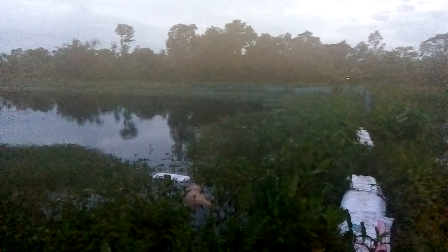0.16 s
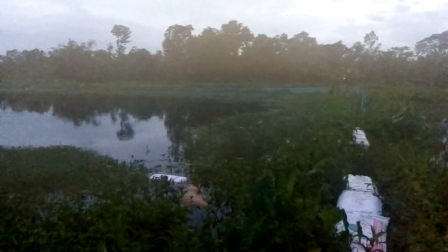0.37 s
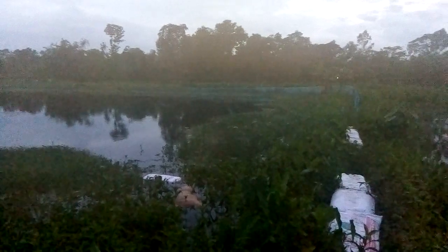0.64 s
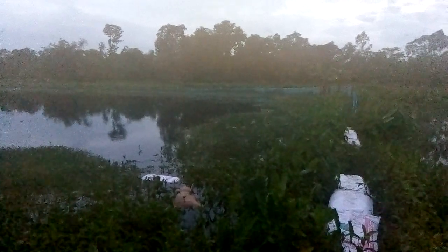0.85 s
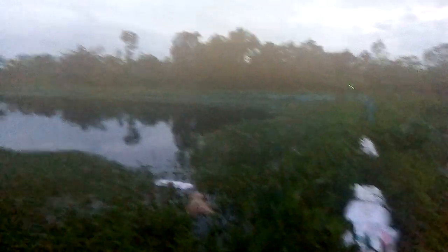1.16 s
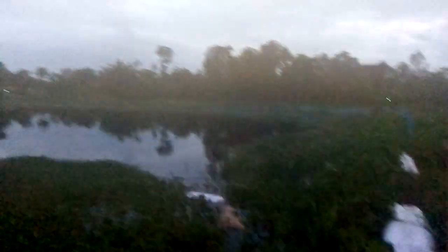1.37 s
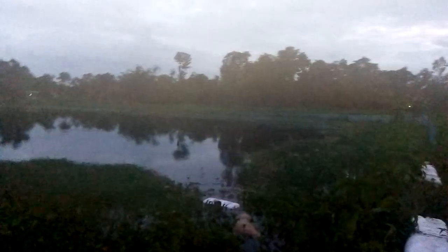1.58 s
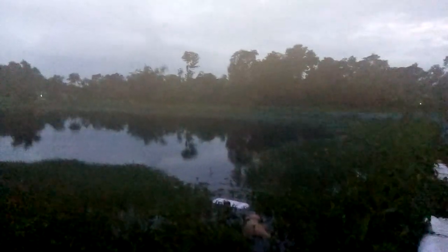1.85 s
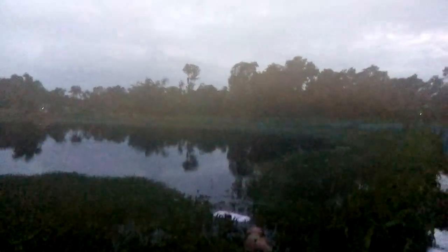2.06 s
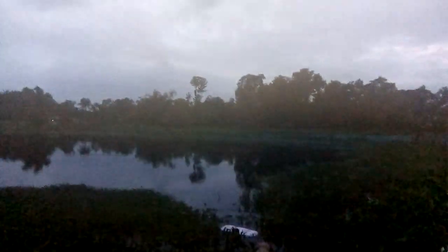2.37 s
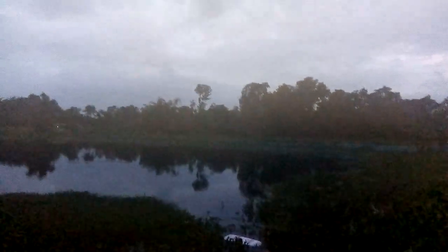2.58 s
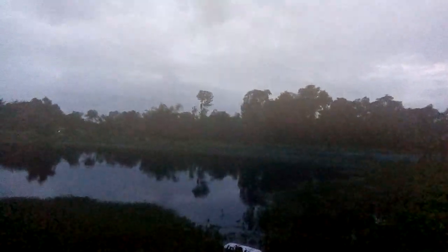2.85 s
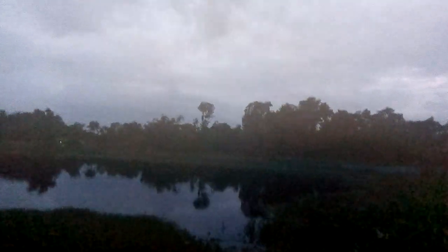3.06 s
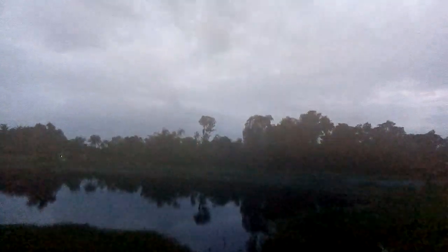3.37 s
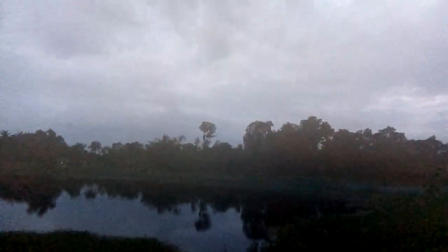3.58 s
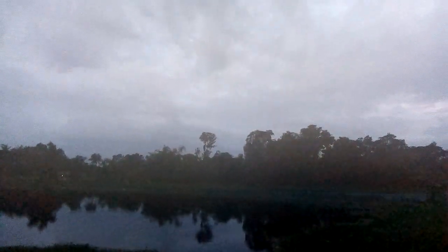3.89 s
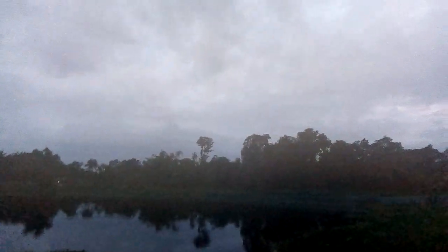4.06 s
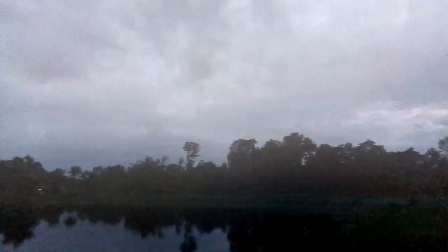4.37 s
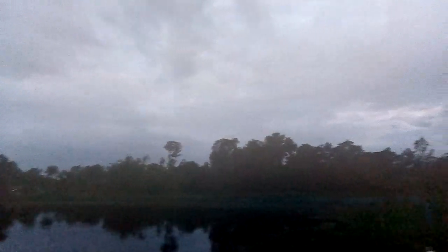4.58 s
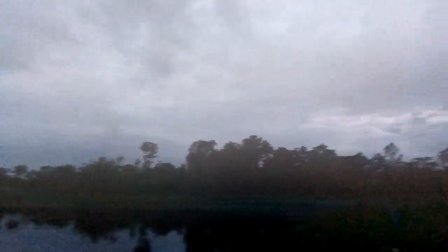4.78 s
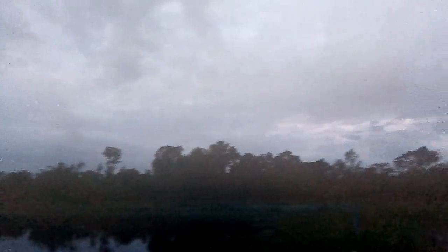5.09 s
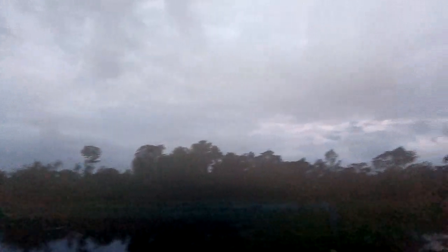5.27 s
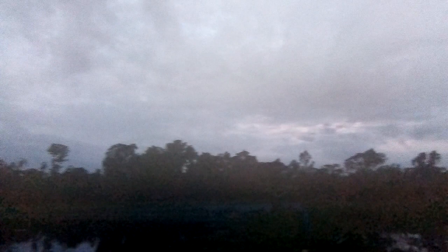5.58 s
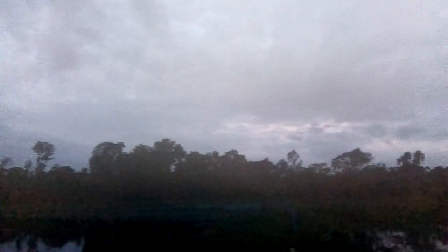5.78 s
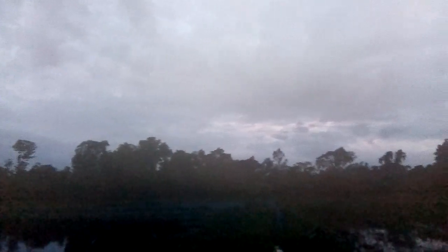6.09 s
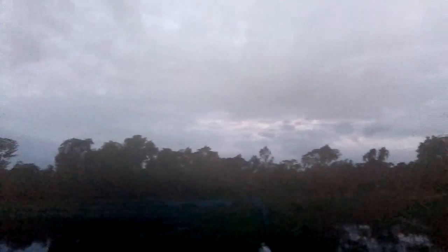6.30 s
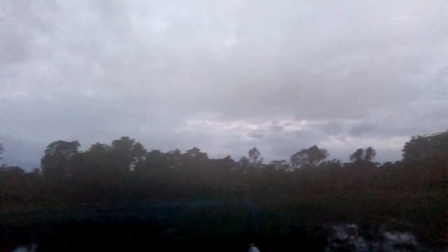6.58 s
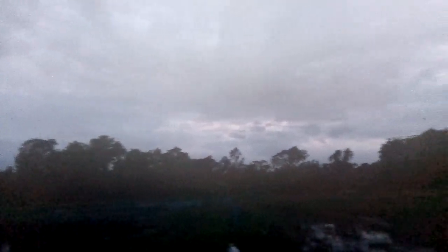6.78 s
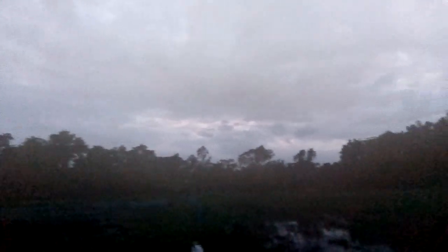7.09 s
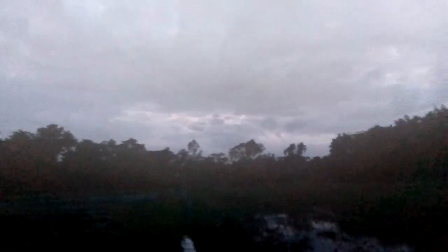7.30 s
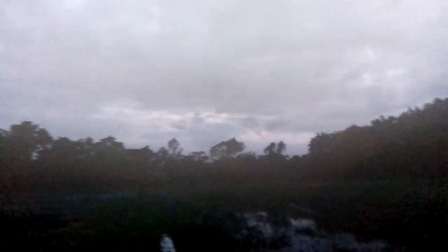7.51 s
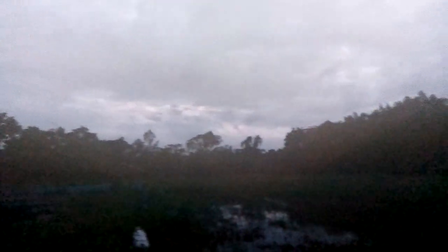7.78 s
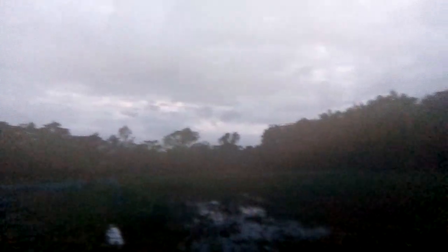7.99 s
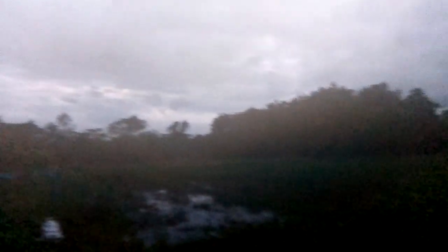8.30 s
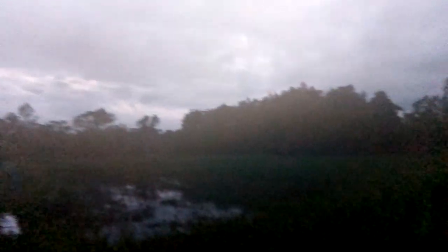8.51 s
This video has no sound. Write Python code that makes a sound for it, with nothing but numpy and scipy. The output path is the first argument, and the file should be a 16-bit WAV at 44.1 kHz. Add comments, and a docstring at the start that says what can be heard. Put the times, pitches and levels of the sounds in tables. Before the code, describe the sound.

Shrill insects drone beside a weedy pond, with rasping katydid swells, echoing four-note cuckoo calls, soft coos, bird chatter and faint late knocks.

```python
"""A far cricket chorus, made of coloured noise, rings over a weedy pond at dusk.
One cricket chirps, a close insect buzzes and then stops, and a katydid rasps: pulsed tones and noise.
A cuckoo repeats four notes, something coos across the water, and birds whistle and chatter:
gliding tones and noise bursts, echoed by the trees. Thin insect trills and still air lie around them.
Soft bumps sound near the microphone, and a few small knocks, made of dying sines, come near the end."""
import sys
import numpy as np
from scipy import signal
from scipy.fft import rfft, irfft, next_fast_len
from scipy.io import wavfile

SR = 44100
rng = np.random.default_rng(int(sys.argv[2]) if len(sys.argv) > 2 else 0)


def dump_mix(stems):
    """Bounce the given channels to the path in sys.argv[1] as a 16-bit WAV at rate SR."""
    frames = np.atleast_2d(stems).T  # one column per channel
    limited = np.clip(frames, -1, 1)  # hard clip at full scale
    pcm = np.round(limited * 32767).astype(np.int16)
    wavfile.write(sys.argv[1], SR, pcm)


N = 381465
TIME = np.arange(N) / SR

# Levels of notes and bursts in the tables hold before the edges are faded and echoes are added.


def from_db(db):
    """Turn decibels into a factor on the sound pressure."""
    return 10 ** (np.asarray(db) / 20)


def rms_one(x):
    """Scale a sound to an rms strength of 1."""
    return x / np.sqrt(np.mean(np.abs(x) ** 2) + 1e-20)


def in_time(rows):
    """Join the points of a table by straight lines; give each column at every sample."""
    s, *columns = np.transpose(rows)
    return [np.interp(TIME, s, column) for column in columns]


def add(out, s, sound):
    """Mix a sound in at a given time."""
    at = int(np.clip(s * SR, 0, len(out)))
    out[at:at + len(sound)] += sound[:len(out) - at]


def flutter(width_hz, size=N):
    """Complex noise that spreads a tone over about the given width; rms 1 before trimming."""
    padded = next_fast_len(size + 4096)
    hz = np.fft.fftfreq(padded, 1 / SR)
    white = rng.standard_normal(padded) + 1j * rng.standard_normal(padded)
    narrowed = white / (1 + (2 * hz / width_hz) ** 4)
    return rms_one(np.fft.ifft(narrowed))[:size]


def drift(rate_hz):
    """Random wandering up to about the given rate; rms 1."""
    return rms_one(flutter(2 * rate_hz).real)


def coloured(spectrum):
    """Noise with a given balance of low and high; rms 1."""
    hz, level_db = np.transpose(spectrum)
    bins_hz = np.maximum(np.fft.rfftfreq(N, 1 / SR), 1)
    gain = from_db(np.interp(np.log(bins_hz), np.log(hz), level_db))
    return rms_one(irfft(rfft(rng.standard_normal(N)) * gain, N))


def tone(hz, wobble=1):
    """A sine on a pitch track, times a complex wobble; a steady one has rms 1."""
    phase = 2 * np.pi * np.cumsum(hz) / SR
    return np.sqrt(2) * (wobble * np.exp(1j * phase)).real


def faded(sound, taper):
    """Round off both ends; taper is the share of the sound that is fading."""
    return sound * signal.windows.tukey(len(sound), taper)


def note(length_s, start_hz, middle_hz, end_hz, rough, rough_hz, taper):
    """One whistled arch through three pitches, made unsteady by noise."""
    size = max(int(length_s * SR), 10)
    arch = np.polyfit([0, .5, 1], [start_hz, middle_hz, end_hz], 2)
    pitch_hz = np.polyval(arch, np.linspace(0, 1, size))
    wobble = (1 + rough * flutter(rough_hz, size)) / np.hypot(1, rough)
    return faded(tone(pitch_hz, wobble), taper)


def song(notes, rough, rough_hz, taper, size=N):
    """Place all the notes of one kind of caller in time."""
    out = np.zeros(size)
    for s, length_s, start_hz, middle_hz, end_hz, db in notes:
        add(out, s, from_db(db) * note(length_s, start_hz, middle_hz, end_hz, rough, rough_hz, taper))
    return out


def slur(s, length_s, hz, glide, db, arch=0):
    """Describe a gliding note that may arch in the middle; glide and arch are shares of its pitch."""
    return s, length_s, hz * (1 - glide / 2), hz * (1 + arch), hz * (1 + glide / 2), db


def repeated(notes, phrases):
    """Sing the same notes again in every phrase."""
    return [(s + offset, *shape, db + note_db)
            for s, db in phrases
            for offset, *shape, note_db in notes]


def bursts(rows, taper):
    """Short noisy sounds, each a band of noise around one resonance."""
    out = np.zeros(N)
    for s, length_s, hz, width_hz, db in rows:
        size = max(int(length_s * SR), 10)
        noise = tone(np.full(size, hz), flutter(width_hz, size))
        add(out, s, from_db(db) * faded(noise, taper))
    return out


# Echoes from the tree line: (delay [s], level before the caller's echo_db is added [dB])
TREE_ECHOES = [(.105, -48.5), (0.188, -25), (0.308, -24.5), (0.544, -21.5)]


def outdoors(x, scatter_db, t60, echo_db):
    """Sound scatters off the banks, dying 60 dB in t60 seconds, and returns smeared from the trees."""
    t = TIME[:SR]
    tail = rng.standard_normal(SR) * from_db(-60 * t / t60)
    response = from_db(scatter_db) * rms_one(tail) / np.sqrt(SR)
    for delay_s, db in TREE_ECHOES:
        smear = rng.standard_normal(SR) * np.exp(-np.abs(t - delay_s) / 0.054)
        response = response + from_db(db + echo_db) * rms_one(smear) / np.sqrt(SR)
    return x + signal.fftconvolve(x, response)[:len(x)]


def weeds(x, scatter_db):
    """Short paths through the plants blur the pulses and leave their pitch lines; rms 1."""
    t = TIME[:SR // 8]
    paths = rms_one(rng.standard_normal(len(t)) * np.exp(-t / 0.005)) / np.sqrt(len(t))
    return rms_one(x + from_db(scatter_db) * signal.fftconvolve(x, paths)[:N])


# Colour of the still air: (frequency [Hz], relative level [dB per Hz])
AIR_COLOUR = [(25, -35), (50, -12.5), (85, 1), (140, -1), (200, -7), (400, -11.5), (1000, -16),
              (11000, -10.5), (12500, -50), (14000, -28), (15000, -12.5)]


def still_air():
    """The faint hush of the air, as steady coloured noise."""
    return from_db(-68.0) * coloured(AIR_COLOUR)


# Soft bumps and shuffles near the microphone:
# (time [s], length [s], centre [Hz], width [Hz], level [dB])
SOFT_BUMPS = [(1.09, 0.032, 107.4, 84, -71), (1.43, .09, 287, 180, -74), (2.53, .07, 424, 150, -74),
              (4.82, 0.086, 118.7, 75, -64), (4.8, 0.14, 291, 356.4, -71.5), (7.75, .1, 330, 252, -72.5),
              (8.16, 0.13, 570, 450, -70), (8.43, .09, 142, 115.6, -63)]


def bumps():
    """Soft thuds near the microphone, as short bands of low noise."""
    return bursts(SOFT_BUMPS, taper=0.51)


# Small knocks: (time [s], pitch [Hz], time to die 60 dB [s], peak before the attack softens it [dB])
SMALL_KNOCKS = [(8.142, 1380, .04, -46), (8.142, 1850, .025, -46), (8.141, 2200, .02, -45),
                (8.337, 830, .035, -45.5), (8.413, 920, .035, -48)]


def knocks(attack_s):
    """Small hollow knocks: resonances that start quickly and die at once."""
    out = np.zeros(N)
    t = TIME[:SR // 10]
    for s, hz, t60, db in SMALL_KNOCKS:
        strength = from_db(db - 60 * t / t60) * (1 - np.exp(-t / attack_s))
        add(out, s, strength * np.sin(2 * np.pi * hz * t))
    return out


def flock(low_hz, high_hz, glide, spread_db, tilt, rough, rough_hz, count):
    """Many distant birds slur short, hoarse notes at random; rms 1."""
    out = np.zeros(N)
    for k, (when, height, span, slope, bend, loud) in enumerate(rng.random((count, 6))):
        hz = low_hz * (high_hz / low_hz) ** height
        sweep = glide * (2 * slope - 1)
        middle_hz = hz * (1 + 2 * glide * (bend - .5))
        length_s = .025 + 0.078 * span
        chirp = note(length_s, hz * (1 - sweep), middle_hz, hz * (1 + sweep), rough, rough_hz, taper=0.53)
        strength = hz ** tilt * from_db(spread_db * loud ** 2)
        add(out, (k + when) / count * TIME[-1], chirp * strength)
    return rms_one(out)


# The far flock: (time [s], level of low voices [dB], level of high voices [dB])
FLOCK_LEVELS = [(0.1, -69, -62), (1.0, -72.5, -65.5), (1.52, -81, -65.5), (1.64, -65.5, -74),
                (4.48, -72.5, -57), (4.67, -59, -58.5), (5.54, -70.5, -61), (5.9, -60, -76),
                (6.28, -81.5, -77), (8.6, -73, -64.5)]


def far_flock():
    """Low voices slur and warble; high voices twitter harshly."""
    low_db, high_db = in_time(FLOCK_LEVELS)
    low = flock(low_hz=1821, high_hz=3354, glide=.1, spread_db=-0.5, tilt=0.43,
                rough=0.52, rough_hz=278, count=270)
    high = flock(low_hz=3326, high_hz=6980, glide=.06, spread_db=9, tilt=-0.6,
                 rough=4.2, rough_hz=710, count=300)
    return from_db(low_db) * low + from_db(high_db) * high


def thin_whistle():
    """One long thin whistle from far off, lifted slightly in the middle."""
    thin = [slur(s=5.9, length_s=1.6, hz=3127, glide=0, db=-74.5, arch=0.022)]
    return song(thin, rough=1.0, rough_hz=61, taper=0.41)


# Low coos: (time [s], length [s], pitch [Hz], glide [share of the pitch], level [dB])
COO_NOTES = [(0.269, 0.39, 604, -0.11, -71.5), (1.332, .33, 768, 0.029, -79),
             (2.196, .13, 710, -.04, -80.5), (2.618, 0.39, 690, -0.058, -75.5),
             (3.62, 0.25, 679, -.25, -69.5), (3.94, 0.23, 589, -.03, -77), (4.324, 0.28, 722, -.12, -61),
             (4.548, 0.22, 636, -.17, -65), (5.348, 0.42, 618, -0.038, -66.5),
             (6.12, 0.23, 605, -0.036, -67.5), (6.708, 0.094, 715, -0.014, -75),
             (7.018, 0.22, 617, -0.067, -66.5)]


def coos():
    """Soft, wavering coos from across the water, each gliding and lifted a little in the middle."""
    notes = [slur(*row, arch=0.0128) for row in COO_NOTES]
    voice = song(notes, rough=.75, rough_hz=110, taper=.35)
    return outdoors(voice, scatter_db=-5, t60=1.0, echo_db=-5)


# Rising whistles: (time [s], pitch [Hz], level [dB])
RISING = [(.08, 3164, -56.5), (.24, 3180, -60.5), (1.035, 2210, -71), (2.605, 3480, -50.5),
          (3.42, 3590, -50), (4.065, 3910, -48)]
# Sharp falling chips: (time [s], pitch [Hz], level [dB])
FALLING = [(.9, 2220, -67), (1.11, 2170, -68), (1.305, 2420, -71), (3.585, 3760, -54), (3.62, 3740, -53),
           (4.24, 3790, -56), (4.645, 3670, -53.5), (5.58, 3950, -53), (8.31, 3830, -51.5)]
# Almost level piping notes: (time [s], length [s], pitch [Hz], level [dB])
PIPING = [(0.186, .05, 2090, -61), (.29, .05, 3370, -62), (0.384, .06, 2720, -57),
          (.955, 0.093, 1630, -71.5), (2.42, 0.1, 2030, -69), (3.171, .18, 2420, -59.5),
          (3.798, 0.14, 2070, -67.5), (3.928, .026, 2620, -55.5), (4.68, .24, 2450, -65),
          (4.797, .025, 2460, -48), (6.401, 0.17, 1277, -77), (6.843, .13, 1635, -80),
          (7.046, 0.072, 2247, -70), (7.295, 0.09, 1260, -72)]


def whistlers():
    """Rising whistles, falling chips and almost level pipes, as gliding tones with a flutter."""
    notes = [slur(s, .05, hz, 0.152, db) for s, hz, db in RISING]
    notes += [slur(s, .033, hz, -.21, db) for s, hz, db in FALLING]
    notes += [slur(s, length_s, hz, 0.0297, db) for s, length_s, hz, db in PIPING]
    return song(notes, rough=0.5, rough_hz=262, taper=0.27)


HOARSENESS = 0.26  # width of a hoarse call, as a share of its centre
# The loudest hoarse calls: (time [s], length [s], centre [Hz], level [dB])
HOARSE_CALLS = [(2.02, 0.18, 3970, -55.5), (2.38, .12, 4120, -55), (2.63, .17, 3700, -55.5),
                (2.91, 0.054, 4330, -52), (3.03, .1, 3570, -51), (3.16, 0.36, 3725, -54),
                (4.18, .093, 3690, -53.5), (4.43, 0.1, 2020, -61), (4.79, 0.11, 3430, -54.5),
                (4.92, 0.35, 3746, -57.5), (5.53, 0.084, 3466, -52.5), (7.11, 0.069, 2766, -59),
                (7.32, 0.097, 3186, -63), (7.655, 0.063, 2530, -63.5), (8.035, .13, 3750, -57.5),
                (8.26, .09, 3234, -57)]


def chatterers():
    """Hoarse calls as bands of noise: the higher the voice, the wider its noise."""
    calls = [(s, length_s, hz, HOARSENESS * hz, db) for s, length_s, hz, db in HOARSE_CALLS]
    return bursts(calls, taper=0.43)


# The opening rasp of a throaty phrase: (length [s], centre [Hz], level relative to the phrase [dB])
OPENING_RASP = (.09, 2430, 0)
# Then a low note that sinks away, and an upward flick: (time into the phrase [s], length [s],
# start [Hz], middle [Hz], end [Hz], level relative to the phrase [dB])
THROAT_NOTES = [(.165, .07, 2042, 1915, 1900, -2), (.23, .095, 1822, 1772, 1956, -16.5),
                (.333, .034, 2166, 2154, 2480, -2)]
# When the phrase comes: (time [s], level [dB])
THROAT_PHRASES = [(1.485, -52.5), (5.73, -56.5)]


def throaty_bird():
    """A rasp of noise opens each phrase; a sinking tone and an upward flick follow."""
    length_s, hz, rasp_db = OPENING_RASP
    rasps = [(s, length_s, hz, HOARSENESS * hz, db + rasp_db) for s, db in THROAT_PHRASES]
    notes = repeated(THROAT_NOTES, THROAT_PHRASES)
    return bursts(rasps, taper=0.43) + song(notes, rough=0.5, rough_hz=262, taper=0.27)


# A nearer bird's clear call: (time [s], length [s], level [dB])
NEAR_CALLS = [(3.897, 0.1, -44.5), (4.405, .118, -47)]
# Its shape: (share of the call, pitch [Hz], level relative to the call [dB])
NEAR_SHAPE = [(0, 3280, -9), (.2, 3460, -2), (.45, 3505, 0), (.68, 3455, 0), (.84, 3300, -4),
              (1, 2950, -11)]


def near_bird():
    """A pure whistle that arches and slides down at its end."""
    out = np.zeros(N)
    share, hz, shape_db = np.transpose(NEAR_SHAPE)
    for s, length_s, db in NEAR_CALLS:
        progress = np.linspace(0, 1, int(length_s * SR))
        whistle = tone(np.interp(progress, share, hz))
        strength = from_db(db + np.interp(progress, share, shape_db))
        add(out, s, faded(strength * whistle, .2))
    return out


def songbirds():
    """Whistles and chatter from the banks; the farther the bird, the more it is smeared."""
    far = outdoors(far_flock(), scatter_db=-0.5, t60=0.49, echo_db=-4)
    bank_voices = thin_whistle() + whistlers() + chatterers() + throaty_bird()
    bank = outdoors(bank_voices, scatter_db=-5.5, t60=0.7, echo_db=-5.5)
    close = outdoors(near_bird(), scatter_db=-14, t60=.6, echo_db=-4)
    return far + bank + close


LEAD_S = 1  # the cuckoo's sound is built from this long before the start
# The cuckoo's four notes: (time into the phrase [s], length [s], start [Hz], middle [Hz], end [Hz],
# level relative to the phrase [dB])
FOUR_NOTES = [(0, .082, 1110, 1293, 1230, -0.5), (.24, .103, 1166, 1254, 1235, 3),
              (.477, .098, 1293, 1339, 1269, 2), (.695, .107, 1083, 1160, 1156, -1.5)]
# Its phrases, the first already under way: (time [s], level [dB])
FOUR_NOTE_PHRASES = [(-.59, -57), (2.212, -56.5), (4.802, -55.5), (7.492, -59.5)]


def cuckoo():
    """One four-note phrase of arched tones again and again, ringing on among the trees."""
    notes = repeated(FOUR_NOTES, [(s + LEAD_S, db) for s, db in FOUR_NOTE_PHRASES])
    voice = song(notes, rough=0.22, rough_hz=98, taper=0.53, size=N + LEAD_S * SR)
    return outdoors(voice, scatter_db=-7, t60=2.05, echo_db=4.5)[-N:]


# Very high insect whine: (time [s], pitch before it wanders [Hz], level [dB])
HIGH_WHINE = [(1.8, 14300, -84), (2.4, 14500, -75.5), (5.7, 14600, -75.5)]


def thin_insects():
    """Narrow trills of small insects, as fluttering tones, and one brief run of very high ticks."""
    pitch_hz, level_db = in_time(HIGH_WHINE)
    whine = from_db(level_db) * tone(pitch_hz + 20 * drift(8), rms_one(1 + .7 * flutter(160)))
    fade = np.interp(TIME, [1.2, 5.5], from_db([-61, -76]))
    fading = fade * tone(np.full(N, 7945.), flutter(97))
    steady = from_db(-77) * tone(np.full(N, 9710.), flutter(50))
    run = np.interp(TIME, [.8, .95, 1.3, 1.42], [0, 1, 1, 0])
    pulses = np.sin(np.pi * 22 * TIME) ** 4  # 22 ticks per second
    ticks = from_db(-66) * run * pulses * tone(np.full(N, 15300.), flutter(900))
    return whine + fading + steady + ticks


def cricket(pitch_hz, fall_hz, width_hz, uneven_db):
    """Each chirp swells and fades while its pitch sags; their strength wanders; rms 1."""
    chirps_per_s = 9.6 * (1 + 0.042 * drift(.5))
    cycle = (np.cumsum(chirps_per_s) / SR) % 1
    swell = np.sin(np.pi * cycle) * from_db(uneven_db * drift(2.4))
    return rms_one(swell * tone(pitch_hz - fall_hz * (cycle - .5), flutter(width_hz)))


def wing_buzz(strokes_per_s, pitch_hz, width_hz, rough, jitter, sharpness):
    """Every wing stroke restarts a ring of the wing; scraping adds noise to each stroke; rms 1."""
    wander = 1 + jitter * (drift(1.0) + .5 * drift(21.5))
    cycle = (np.cumsum(strokes_per_s * wander) / SR) % 1
    stroke = np.sin(np.pi * cycle) ** (2 * sharpness)
    ring = np.sqrt(2) * np.sin(2 * np.pi * pitch_hz * cycle / strokes_per_s)
    scrape = rough * tone(pitch_hz, flutter(width_hz))
    return rms_one(stroke * (ring + scrape))


# Katydid swells: (start time [s], end time [s], level at full swell [dB])
KATYDID_SWELLS = [(0.147, 1.39, -62), (1.55, 2.93, -59.5), (3.272, 4.523, -60), (5.706, 6.24, -65),
                  (7.103, 7.753, -77)]


def katydid(rise_s):
    """Sharp wing strokes make a broad rasp that grows slowly and breaks off."""
    level = np.zeros(N)
    for start, end, db in KATYDID_SWELLS:
        rise = np.clip((TIME - start) / rise_s, 0, 1)
        stop = np.clip((end - TIME) / 0.012, 0, 1)
        level += from_db(db) * rise * stop
    strokes = wing_buzz(141.0, np.full(N, 9250.), width_hz=1300, rough=1.0, jitter=.003, sharpness=12.0)
    return level * weeds(strokes, scatter_db=9.0)


BUZZ_STOP_S = 7.49
# The buzzing insect: (time [s], wing resonance [Hz], level until it stops [dB])
BUZZ_TRACK = [(0.0, 8180, -57.5), (1.51, 8166, -53.5), (3.36, 8380, -50.5), (4.36, 8350, -51.5),
              (4.65, 8340, -47.5), (5.83, 8260, -56.5), (5.95, 8220, -49), (6.04, 8220, -54),
              (6.29, 8300, -49.5), (6.93, 8210, -54.5), (7.3, 8460, -51.5), (7.45, 8410, -50.5)]


def buzzer():
    """A close insect drones with its wings and stops dead; part of its sound arrives diffusely."""
    pitch_hz, level_db = in_time(BUZZ_TRACK)
    near = wing_buzz(131, pitch_hz, width_hz=820, rough=0.52, jitter=.003, sharpness=3.0)
    diffuse = from_db(-2.5) * tone(pitch_hz, flutter(840))
    drone = rms_one(weeds(near, scatter_db=7.5) + diffuse)
    stop = np.clip((BUZZ_STOP_S - TIME) / 0.012 + .5, 0, 1)
    return from_db(level_db) * drone * stop


# Colour of the cricket chorus: (frequency [Hz], relative level [dB per Hz])
CHORUS_SPECTRUM = [(3500, -43), (3950, -26.5), (4250, -15), (4600, -10.5), (4950, -4), (5350, -2.5),
                   (5650, -5), (6050, -17.5), (6600, -11), (6900, -13), (7400, -7.5), (8000, -16),
                   (9300, -19.5), (10500, -25.5), (12000, -51.5)]


def cricket_chorus():
    """The far crickets blend into coloured noise whose level flickers slightly."""
    level_db = -49.5 + 0.48 * drift(25)
    return from_db(level_db) * coloured(CHORUS_SPECTRUM)


def scene():
    """Add everything up, from the air to the insects, the same in both channels."""
    handling = bumps() + knocks(attack_s=0.00076)
    birds = coos() + songbirds() + cuckoo()
    chirps = from_db(-58.5) * cricket(pitch_hz=7410, fall_hz=560, width_hz=420, uneven_db=.8)
    insects = thin_insects() + chirps + katydid(rise_s=0.32) + buzzer() + cricket_chorus()
    mono = still_air() + handling + birds + insects
    return np.array([mono, mono])


def record(dry):
    """A steep filter cuts the top above 15800 Hz in both channels."""
    lowpass = signal.ellip(10, .2, 70, 15800, fs=SR, output="sos")
    return signal.sosfilt(lowpass, dry)


dry = scene()
out = record(dry)
dump_mix(out)
```